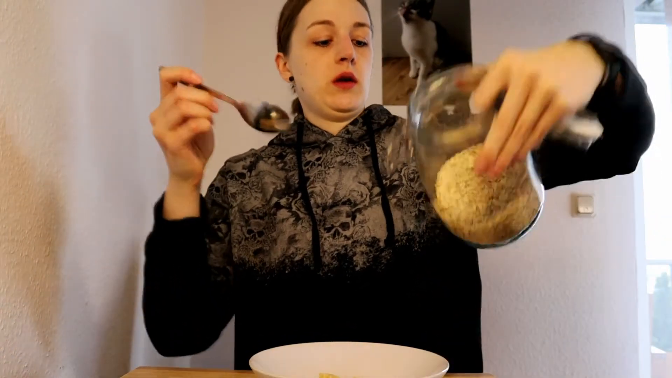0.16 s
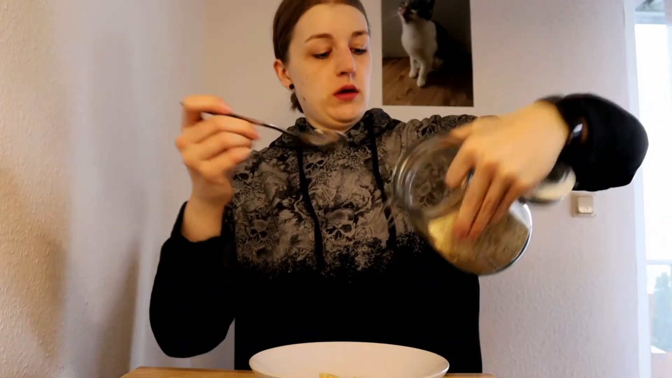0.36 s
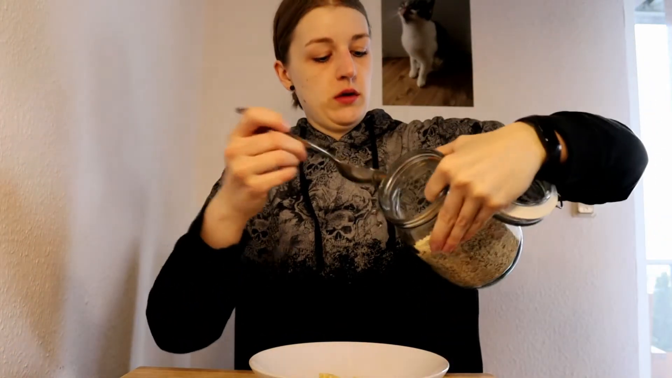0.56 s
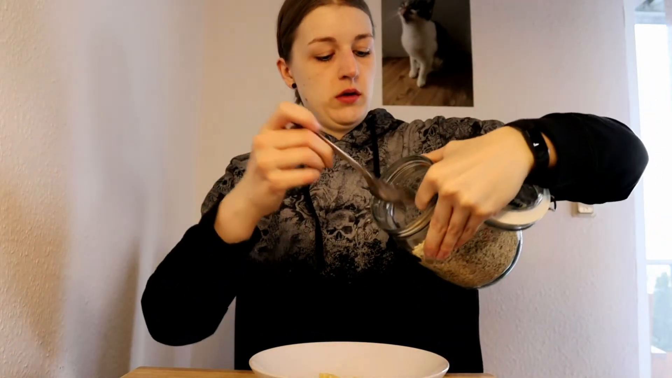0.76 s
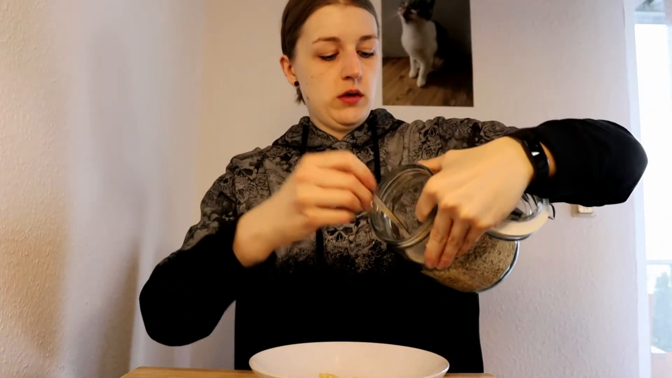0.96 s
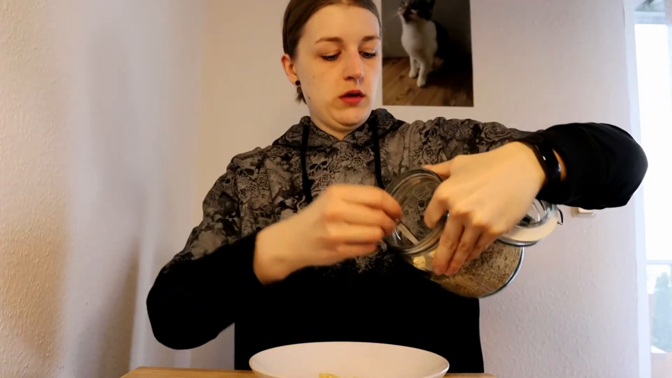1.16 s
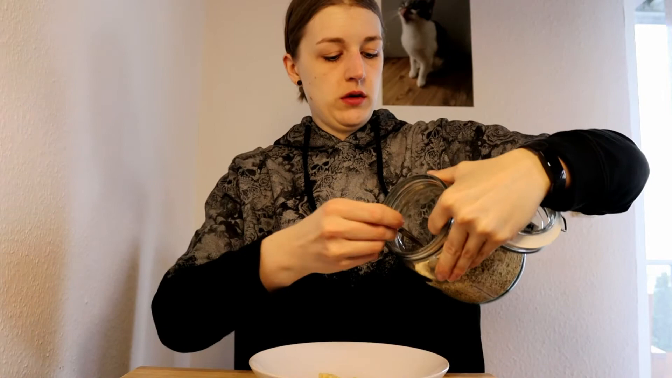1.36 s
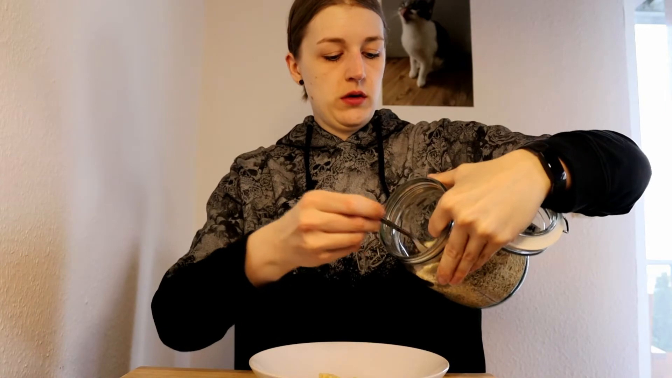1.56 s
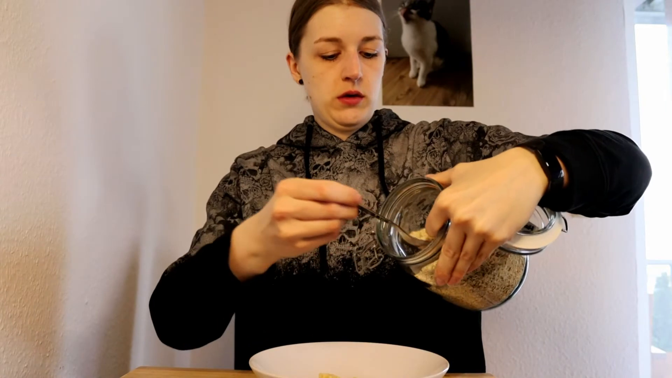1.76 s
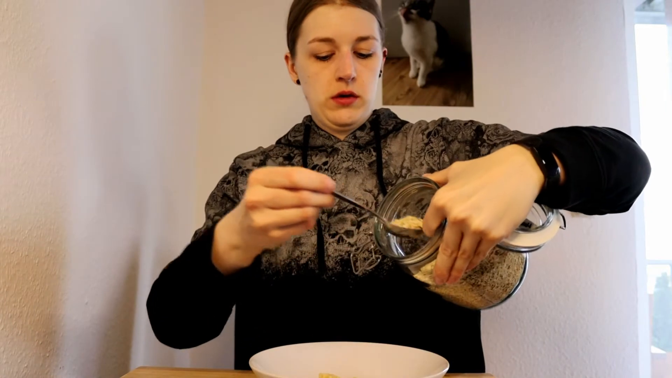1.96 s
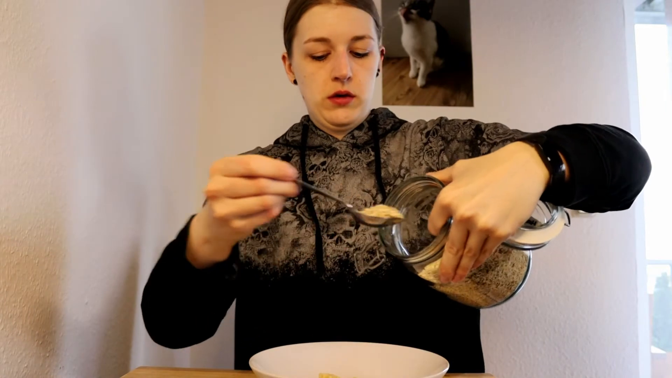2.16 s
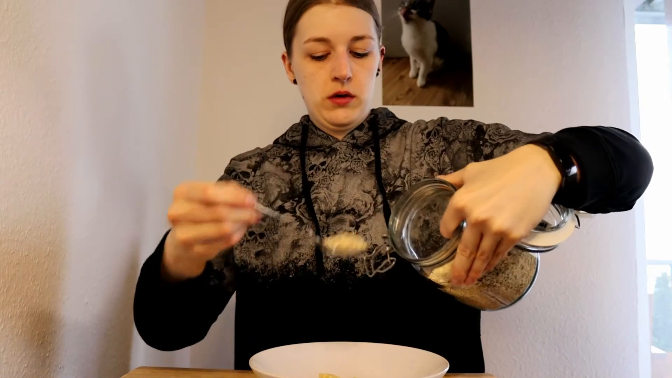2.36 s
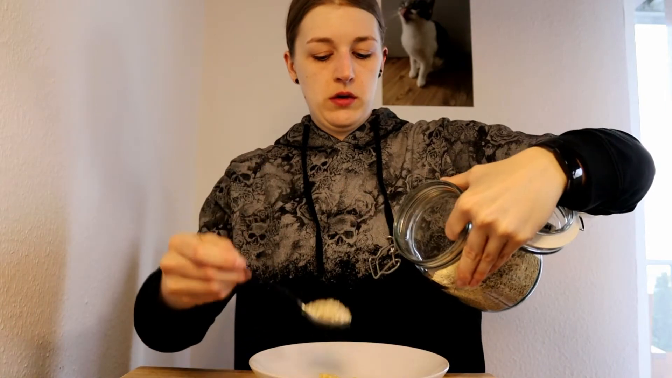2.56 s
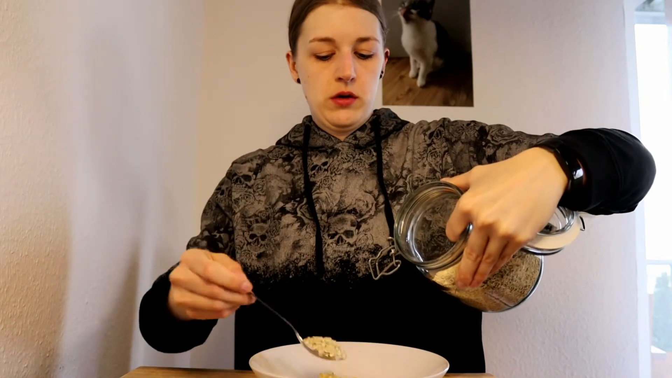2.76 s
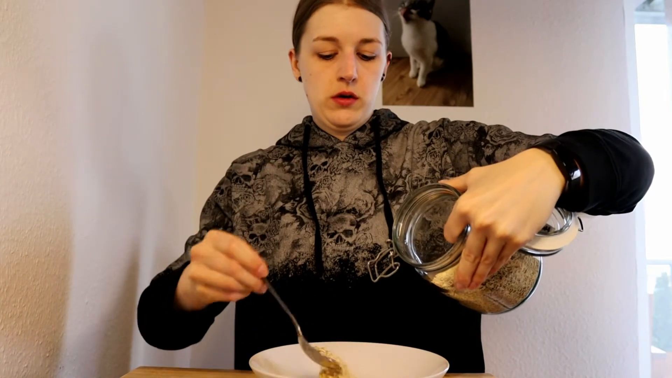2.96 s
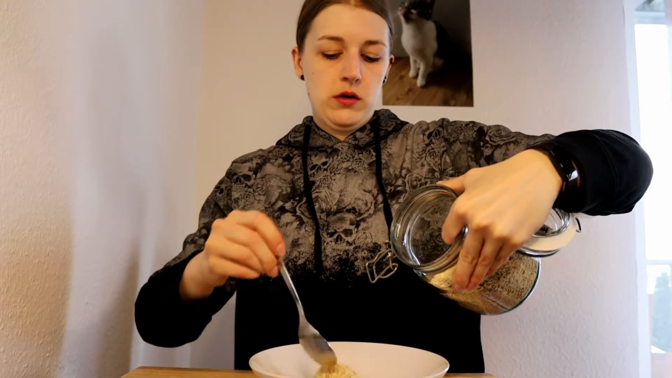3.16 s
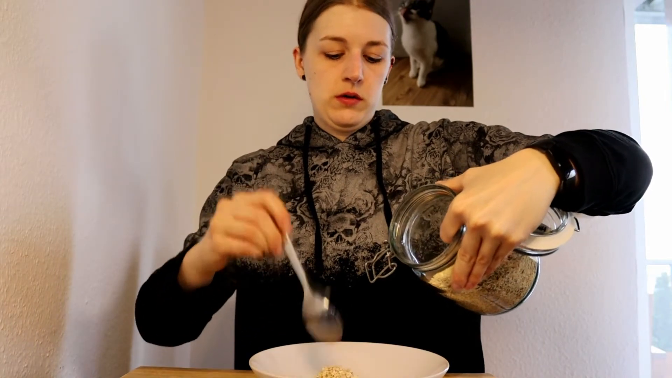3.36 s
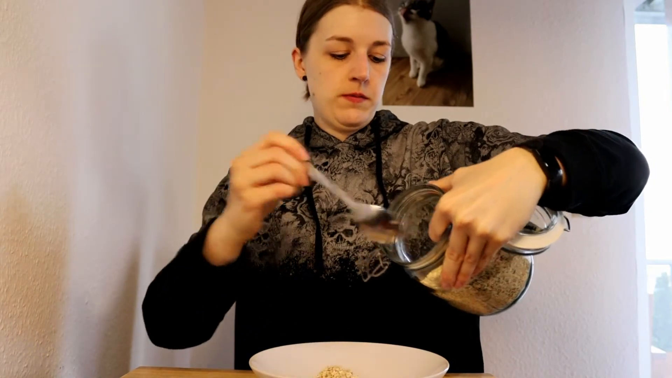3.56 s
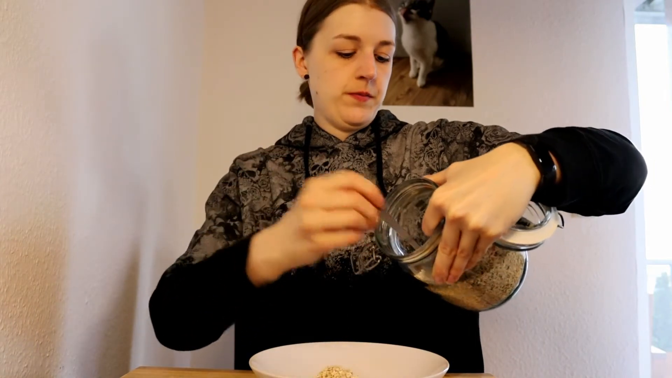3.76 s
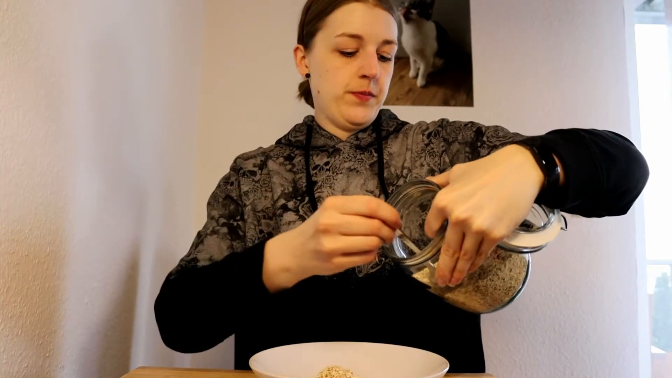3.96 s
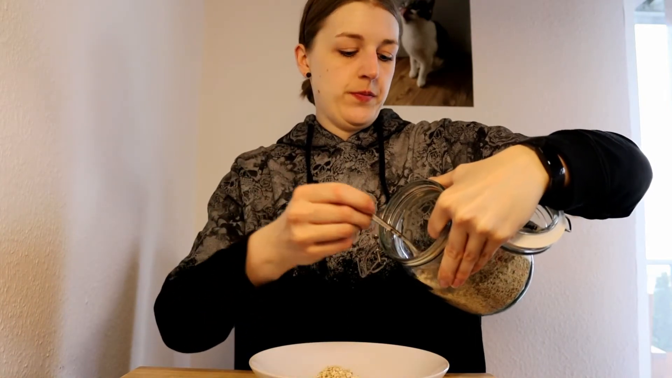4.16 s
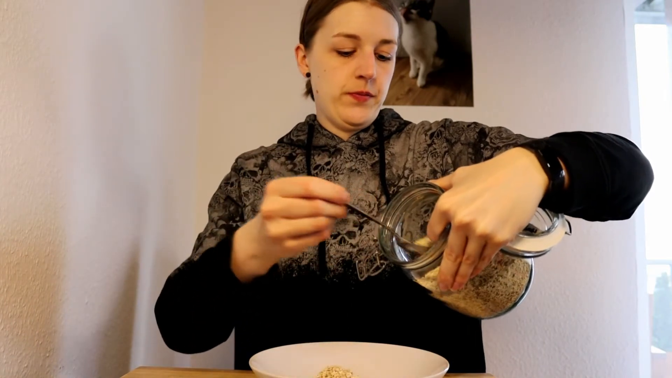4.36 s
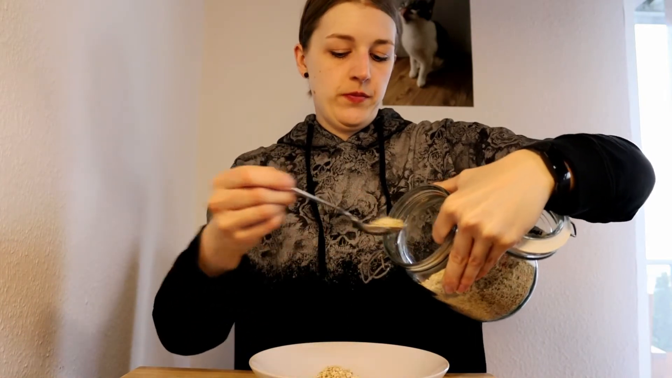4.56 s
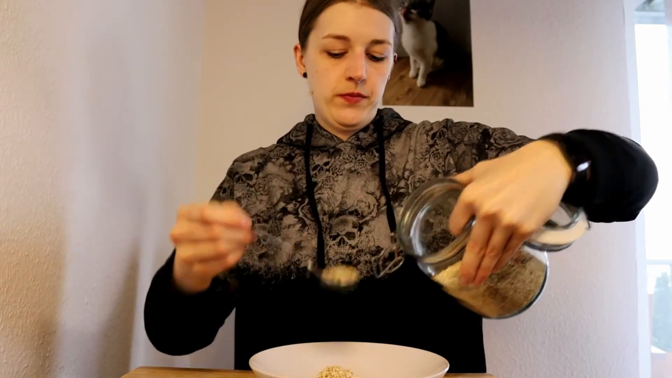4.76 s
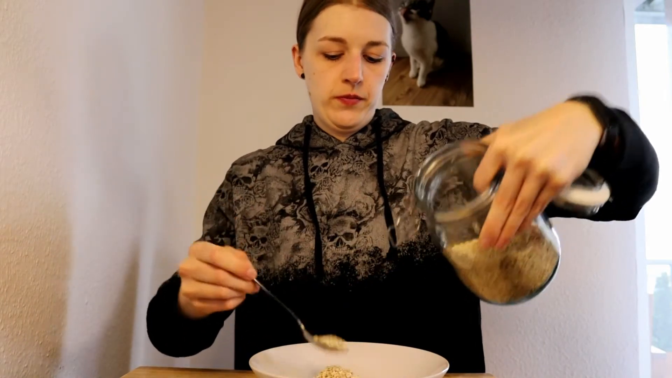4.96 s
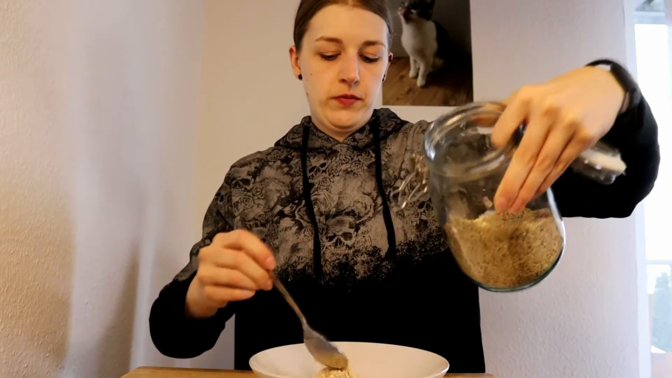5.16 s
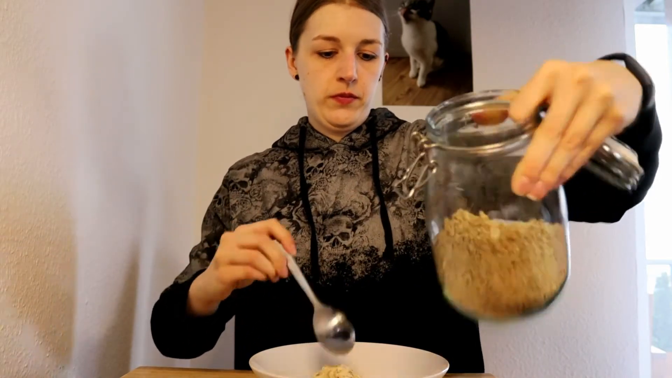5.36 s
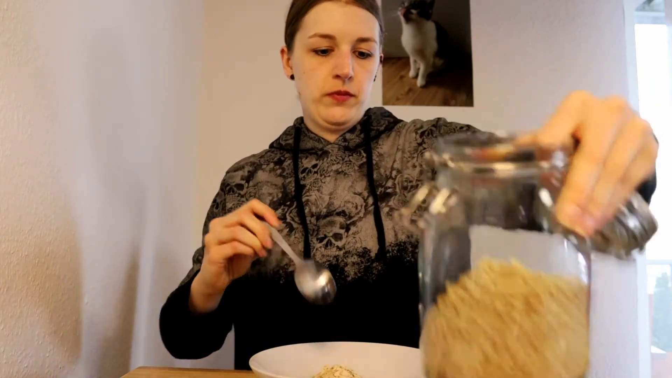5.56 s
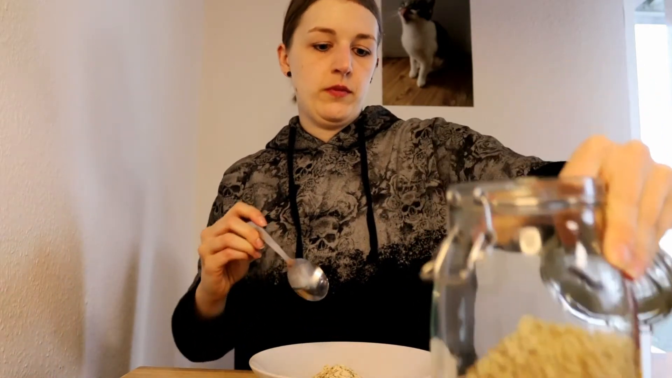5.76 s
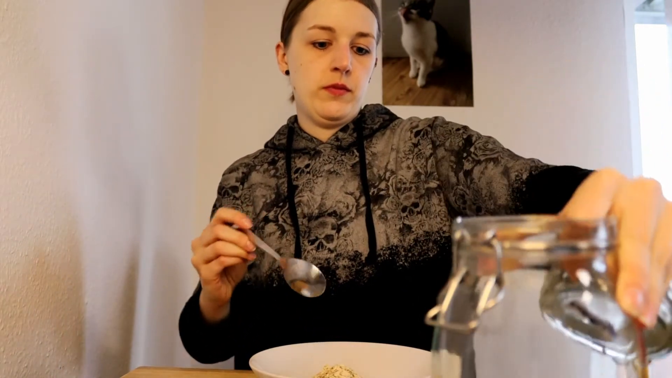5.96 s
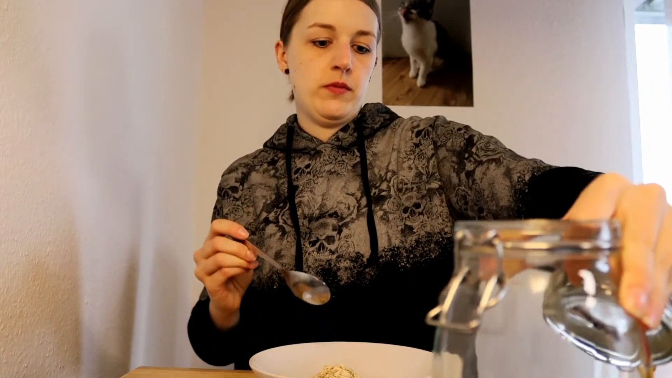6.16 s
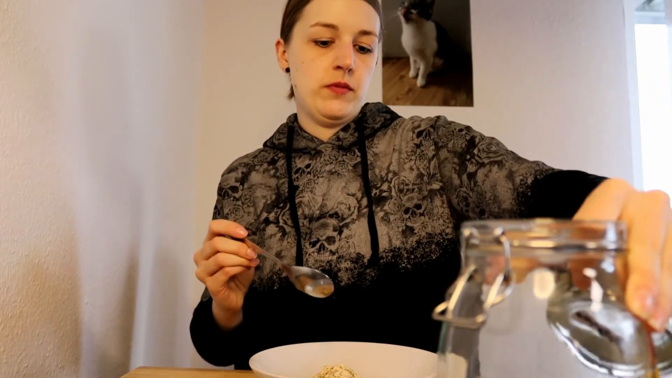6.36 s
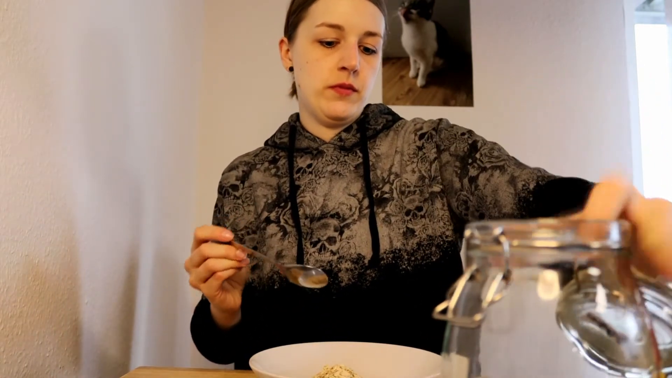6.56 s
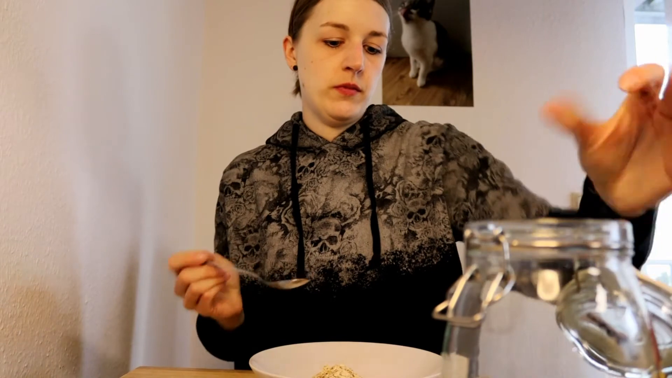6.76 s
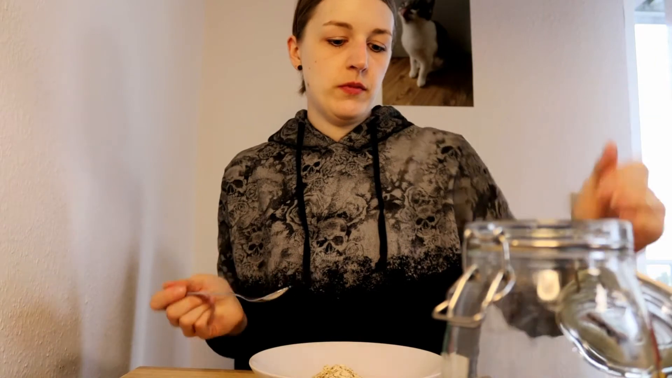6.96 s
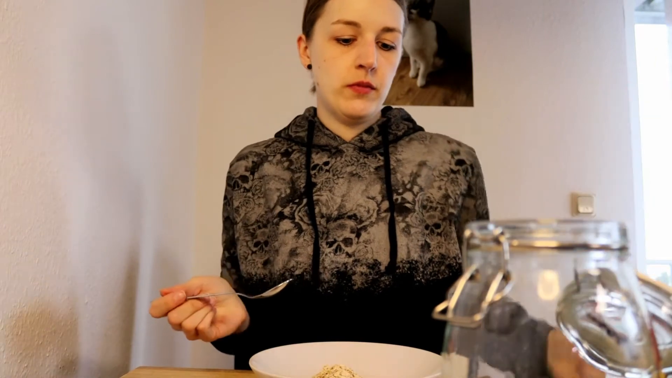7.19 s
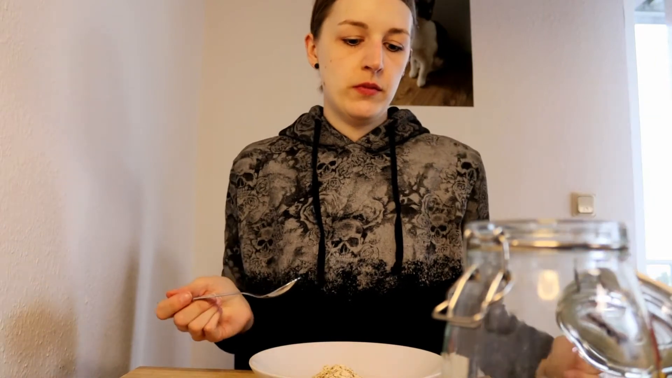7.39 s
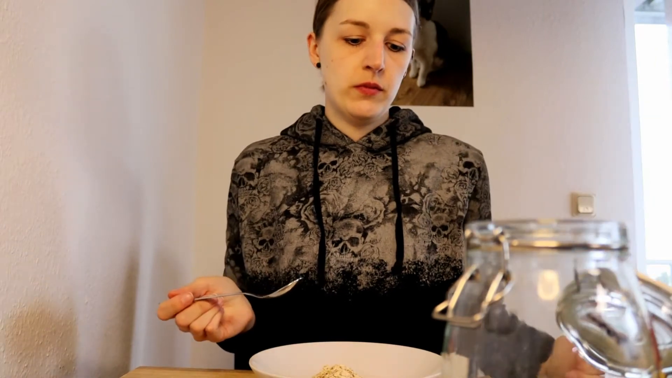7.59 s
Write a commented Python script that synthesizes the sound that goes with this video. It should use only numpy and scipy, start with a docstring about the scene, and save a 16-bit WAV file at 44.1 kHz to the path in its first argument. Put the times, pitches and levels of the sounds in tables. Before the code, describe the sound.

Oats are spooned from a clip-top glass jar into a china bowl, lid knocking, bright clinks, then the jar thuds loudly onto a wooden table.

```python
"""Spooning oats from a jar

Oats are spooned from a clip-top glass jar into a china bowl in a small kitchen, while two cars pass outside.
Lid, wire clasp, rim, taps and table are struck bodies: decaying modes plus filtered contact noise.
Flakes are dense random ticks coloured by glass or china, and the cars are shaped noise falling off as
1 / distance. The jar is set down close to the microphone, whose limiter ducks the loudest knocks."""
import sys
import numpy as np
from scipy import signal
from scipy.fft import rfft, irfft, next_fast_len
from scipy.io import wavfile
from scipy.ndimage import uniform_filter1d, minimum_filter1d

SR = 44100
rng = np.random.default_rng(int(sys.argv[2]) if len(sys.argv) > 2 else 0)


def digitize_waveform(pressure):
    """Quantize a signal to 16-bit integers and store it at the path in sys.argv[1].

    Rows of a 2-D input are taken as channels; values are limited to [-1, 1].
    """
    field = np.atleast_2d(pressure).T
    bounded = np.clip(field, -1, 1)
    quanta = np.round(bounded * 32767).astype(np.int16)
    wavfile.write(sys.argv[1], SR, quanta)


N = 336483
TIME = np.arange(N) / SR  # s
RING = TIME[:SR * 3 // 4]  # time axis of one blow and of the room's tail, s


def undb(db):
    """Logarithmic level: decibels become an amplitude gain."""
    return 10 ** (np.asarray(db) / 20)


def unit(x):
    """Normalisation: scale to an rms value of 1."""
    return x / np.sqrt(np.mean(x ** 2))


def at(points, hz):
    """Spectral interpolation: read (f/Hz, value) points on a log-frequency axis."""
    f, value = np.transpose(points)
    return np.interp(np.log(hz + 1), np.log(f), value)


def shape(x, gain):
    """Minimum-phase filtering: folding the cepstrum makes the magnitude gain(hz) causal."""
    n = 2 * next_fast_len(x.shape[-1])
    hz = np.arange(n // 2 + 1) * SR / n
    cepstrum = irfft(np.log(gain(hz) + 1e-9))
    cepstrum[1:n // 2] *= 2
    cepstrum[n // 2 + 1:] = 0
    response = np.exp(rfft(cepstrum))
    return irfft(rfft(x, n) * response)[..., :x.shape[-1]]


def stereo(pair, points, apart_hz):
    """Interaural coherence: two unrelated signals share one colour, most alike well below apart_hz."""
    def width(hz):
        return .1 + .75 * hz ** 2 / (hz ** 2 + apart_hz ** 2)

    mid = shape(pair[0], lambda hz: undb(at(points, hz)))
    side = shape(pair[1], lambda hz: undb(at(points, hz)) * width(hz))
    return unit(np.array([mid + side, mid - side]))


def resonate(x, modes, lift_db, width_hz):
    """Resonance: noise made on a body is lifted around each mode, in bands that widen with frequency."""
    top = max(db for db, _ in modes.values())

    def gain(hz):
        total = 0
        for f, (db, _) in modes.items():
            half_width = width_hz * np.sqrt(f / 1000)
            total = total + undb(db - top) / (1 + ((hz - f) / half_width) ** 2)
        return 1 + undb(lift_db) * total
    return shape(x, gain)


def waver(rate, spread_db):
    """Random modulation: chance levels, drawn rate times a second, are smoothed into a wandering gain."""
    k = int(SR / rate)
    held = np.repeat(rng.standard_normal(N // k + 1), k)
    return undb(spread_db * uniform_filter1d(held, k)[:N])


def add(out, s, x):
    """Superposition: mix x into out from time s."""
    i = int(s * SR)
    out[:, i:i + x.shape[1]] += x[:, :N - i]


def strike(modes, crack, crack_db, crack_t60, snap_db, spread):
    """Modal impact: modes start together, so close pairs beat, under a burst of contact noise."""
    hz, db, t60 = np.transpose([(f, *mode) for f, mode in modes.items()])[:, :, None]
    # each mode reaches the two sides out of step
    skew = spread * np.minimum(hz / 2000, 1) * rng.choice([-1, 1], hz.shape)
    phase = 2 * np.pi * hz * RING + hz / 5000 * rng.standard_normal(hz.shape)
    fade = undb(db - 60 * RING / t60)
    ring = np.array([(fade * np.sin(phase + side * skew)).sum(0) for side in (-1, 1)])
    ring *= 1 - np.exp(-RING / 0.0023)
    noise = stereo(rng.standard_normal((2, len(RING))), crack, 900)
    noise = resonate(noise, modes, lift_db=8.5, width_hz=33)
    burst = noise * undb(-60 * RING / crack_t60)
    # the first milliseconds of hard contact are the brightest
    snap = np.diff(noise, prepend=0) * np.exp(-(RING / 0.0022) ** 2)
    return unit(ring) + undb(crack_db) * unit(burst) + undb(snap_db) * unit(snap)


def blows(events, modes, crack, crack_db, crack_t60, snap_db, spread):
    """Contact stiffness: softer contact dulls a blow, and its place may favour one resonance."""
    out = np.zeros((2, N))
    for s, db, soft_hz, pan_db, *place in events:
        x = strike(modes, crack, crack_db, crack_t60, snap_db, spread)
        x = shape(x, lambda hz: 1 / np.sqrt(1 + (hz / soft_hz) ** 4))
        if place:
            place_hz, lift_db = place
            x = shape(x, lambda hz: undb(lift_db / (1 + ((hz - place_hz) / 75) ** 2)))
        x /= np.sqrt(np.mean(x[:, :SR // 50] ** 2))  # the level is that of the first 20 ms
        pan = np.array([[pan_db], [-pan_db]]) / 2
        add(out, s, x * undb(db + pan))
    return out


SLIDE_RANGE_DB = 20  # change of level over one rise or one fall
CLUMPS_PER_S, CLUMP_DB = 45, 3  # flakes move in clumps


def flow(slides):
    """Granular flow: each slide swells exponentially to its peak and runs out, in uneven clumps."""
    power = 0
    for s, db, rise, fall in slides:
        from_peak = np.maximum((s - TIME) / rise, (TIME - s) / fall)
        power = power + undb(db - SLIDE_RANGE_DB * from_peak) ** 2
    return np.sqrt(power) * waver(CLUMPS_PER_S, CLUMP_DB)


def oats(slides, colour, vessel, per_s, size_db, lift_db, width_hz):
    """Shot noise: countless flakes of uneven size tick against a vessel and pick up its resonances."""
    struck = rng.random((2, N)) < per_s / SR
    size = undb(size_db * np.minimum(rng.exponential(size=(2, N)), 4))
    ticks = struck * rng.standard_normal((2, N)) * size
    coloured = stereo(ticks, colour, 1500)
    return unit(resonate(coloured, vessel, lift_db, width_hz)) * flow(slides)


# cars outside: nearest at t/s, speed/(m/s), road roar level/dB, tyre hum level/dB, engine level/dB
CARS = [(2.45, 13.7, -48.5, -58.5, -81), (3.92, 9.2, -58.5, -57.5, -64)]
# colours of road roar, tyre hum and engine: f/Hz, level/dB
ROAR = [(35, -24), (55, 0), (85, -24.5), (130, -7), (190, 2), (330, 0.5), (550, -6.5), (850, -3.5),
        (1300, -7.5), (2000, -21), (3500, -36), (8000, -45.5)]
TYRES = [(300, -17), (700, -23), (1030, 2.5), (1300, -13), (1800, -14), (4000, -42)]
ENGINE = [(25, -26.5), (44, -8), (54, 1.5), (66, -9), (100, -4.5), (160, -34.5)]
STREET_M = 10.3  # nearest distance of the cars
ROAR_REAR_DB, ENGINE_FRONT_DB = 0.56, 2.5  # the roar is louder behind a car, the engine ahead of it


def traffic():
    """Spherical spreading: cars pass at steady speed, their amplitude falling off as 1 / distance."""
    power = 0
    for s, speed, roar_db, tyre_db, engine_db in CARS:
        along = speed * (TIME - s)
        distance = np.hypot(along, STREET_M)
        away = along / distance  # negative approaching, positive receding
        roar_level = roar_db + ROAR_REAR_DB * away
        engine_level = engine_db - ENGINE_FRONT_DB * away
        levels = [roar_level, np.full(N, tyre_db), engine_level]
        power = power + (undb(levels) * STREET_M / distance) ** 2
    roar, tyres, engine = (stereo(rng.standard_normal((2, N)), colour, 620) * gain
                           for colour, gain in zip((ROAR, TYRES, ENGINE), np.sqrt(power)))
    return roar * waver(4.5, 0.31) + tyres * waver(9.7, 0.4) + engine


# colour of the still air in the room: f/Hz, level/dB
STILL_AIR = [(15, -58.5), (25, -27.5), (76, -11.5), (130, -5), (195, -10.5), (277, -14.5), (301, -25),
             (451, -12), (531, -18.5), (575, -22), (962, -28.5), (1790, -26), (2990, -26), (13600, -34),
             (16000, -31.5)]


def still_air(level_db):
    """Stationary noise: a steady, coloured hush."""
    return undb(level_db) * stereo(rng.standard_normal((2, N)), STILL_AIR, 1200)


# flakes sliding as the jar tilts or the spoon digs: peak t/s, level/dB, rise t/s, fall t/s
JAR_SLIDES = [(.15, -60, 0.26, .7), (.46, -40, 0.097, 0.095), (1.16, -55, 0.23, 0.36),
              (1.64, -58.5, 0.73, 0.35), (3.87, -50.5, 0.16, 0.16), (4.28, -58, 0.32, 0.2),
              (4.54, -63, 0.22, 0.16), (5.42, -51, 0.2, .24), (5.78, -48.5, 0.35, 0.069)]
# colour of flakes sliding on glass: f/Hz, level/dB
SLIDING = [(800, -19), (2700, -6), (3800, -1.5), (6000, -5), (7200, -6), (10000, -4), (14000, 1.5),
           (16000, -1.5)]
# resonances of the air inside the jar: f/Hz: (level/dB, t60/s, which sliding does not use)
JAR_AIR = {3794: (-1, .05), 4641: (-1, .05), 4961: (-2.2, .05), 6200: (-1, .05), 7950: (-4, .05),
           8300: (0, .05)}


def sliding_in_jar():
    """Cavity resonance: sliding flakes are heard through the air inside the jar."""
    return oats(JAR_SLIDES, SLIDING, JAR_AIR, per_s=5000, size_db=2.6, lift_db=7, width_hz=40)


# wire ticking in its hinge: t/s, level/dB, left minus right level/dB
WIRE_TICKS = [(0.125, -50, -5), (0.183, -40.5, -2), (0.1995, -37, -6), (5.4568, -42, -5),
              (5.5424, -45, -10), (5.5975, -33.5, -6.5), (5.7695, -38.5, -2.5)]
# clasp striking the glass, which rings both: t/s, glass level/dB, wire level/dB, wire cut-off f/Hz,
# left minus right level/dB, resonance at that place f/Hz, its lift level/dB
CLASP_KNOCKS = [(5.3993, -40, -35, 8650, -5.5, 1900, 6.5), (5.5492, -19.5, -33.5, 5500, -2, 2200, 4),
                (5.6080, -21.5, -31.5, 11030, 0.5, 1550, 1.5), (5.6503, -28.5, -49, 9010, -0.5, 1760, 2),
                (5.6730, -32, -24, 13000, -3, 1250, 6), (5.7010, -30.5, -36, 10900, -0.5, 1720, 1.5)]
# modes of the wire: f/Hz: (level/dB, t60/s)
WIRE = {3770: (-6, .05), 4950: (-2, 0.043), 5180: (0, .06), 5420: (-2, 0.045), 7940: (0.5, 0.072),
        9550: (-3.5, .06), 9850: (-2, 0.078), 10550: (-1, 0.054), 12700: (-8, 0.078), 14100: (3, .07)}
# colour of its contact noise: f/Hz, level/dB
WIRE_CRACK = [(500, -16.5), (1800, -2), (3000, -21), (3800, 0.5), (4300, -16.5), (5200, -1), (6900, -17),
              (8000, -15.5), (10300, -4), (11600, -4), (14000, -2.5), (16000, -14.5)]
WIRE_CUT_HZ, WIRE_BOUNCE_S, WIRE_BOUNCE_DB = 13500, 0.0047, 0  # every tick rebounds once


def wire():
    """Rebound: the wire rings with each clasp knock, and ticks twice each time it moves in its hinge."""
    ticks = [(s, db, cut_hz, pan) for s, _, db, cut_hz, pan, *_ in CLASP_KNOCKS]
    for s, db, pan in WIRE_TICKS:
        ticks.append((s, db, WIRE_CUT_HZ, pan))
        ticks.append((s + WIRE_BOUNCE_S, db + WIRE_BOUNCE_DB, WIRE_CUT_HZ, pan))
    return blows(ticks, WIRE, WIRE_CRACK, crack_db=7.0, crack_t60=0.045, snap_db=-13, spread=0.63)


# glass lid knocking on its hinge: t/s, level/dB, left minus right level/dB, lift of its longest ring level/dB
LID_KNOCKS = [(0.1424, -20, -2.5, -2.5), (0.7180, -34.5, -2, -1.5), (1.499, -47.5, 2, 9),
              (2.763, -50, 3, 5), (3.02, -54, 2, 3), (3.4610, -51.5, -1, 5)]
# modes of the lid: f/Hz: (level/dB, t60/s)
LID = {1136: (1.7, 0.037), 1165: (-8.5, 0.099), 1560: (-3, 0.062), 1739: (2, 0.044), 1800: (-1.1, 0.098),
       1850: (-7.5, .16), 1965: (1.94, 0.056), 2288: (-7, 0.047), 2934: (-7, 0.019), 3450: (-16, 0.032),
       3763: (-0.506, 0.041), 4861: (-13, .04), 5432: (-14.5, .04)}
# colour of its contact noise: f/Hz, level/dB
LID_CRACK = [(150, -33.5), (400, -14), (650, -6), (900, -21), (1200, -2), (1900, -4), (2600, -8),
             (4200, -8), (5200, -1), (7000, -19), (9000, -10), (15000, -12)]
LID_CUT_HZ, LID_DB_PER_OCTAVE = 4200, 49.5  # cut-off at 0 dB, and the rise in level that doubles it
LID_RING_HZ = 1850  # its longest ring


def lid():
    """Nonlinear contact: a harder knock of the lid is brighter."""
    knocks = []
    for s, db, pan, lift in LID_KNOCKS:
        cut_hz = LID_CUT_HZ * 2 ** (db / LID_DB_PER_OCTAVE)
        knocks.append((s, db, cut_hz, pan, LID_RING_HZ, lift))
    return blows(knocks, LID, LID_CRACK, crack_db=0.5, crack_t60=0.03, snap_db=-13.0, spread=0.57)


# spoon on the jar: t/s, level/dB, rim resonance f/Hz, its lift level/dB
CLINKS = [(0.9224, -15.5, 1637, -1), (3.7490, -23, 1670, 3.5)]
# returns of every clink: delay t/s, level re the clink/dB, cut-off f/Hz, left minus right level/dB,
# rim resonance f/Hz, its lift level/dB
CLINK_RETURNS = [(.0096, -8.5, 4600, 4, 1650, 4), (0.0416, -13.5, 1900, 1.5, 1710, 8.5)]
# modes of the jar: f/Hz: (level/dB, t60/s)
JAR = {1141: (-22, .2), 1529: (-3, .18), 1591: (-6, .12), 1626: (3, .23), 1648: (-1, .19), 1690: (-3, .14),
       1783: (-5, .14), 1986: (-13, .12), 2290: (-12, .06), 2620: (-11, .06), 3074: (-8, .08),
       3548: (-15, .1), 3765: (-11, .28), 3892: (-11, .1), 4506: (-15, .09), 4936: (-12, .16),
       5150: (-9, .07), 5696: (-18, .08), 7950: (-7, .06), 8441: (-3, .09), 8540: (-12, .28),
       9060: (-9, .08), 9841: (-6, .08), 10595: (2, .09), 12620: (-5, .07), 12830: (-11, .24),
       14420: (-5, .08), 15200: (-8, .07)}
# colour of its contact noise: f/Hz, level/dB
JAR_CRACK = [(200, -18.5), (450, -16.5), (700, -2.5), (1100, -11), (1700, -0.5), (2400, -2), (3600, -6),
             (5200, 2), (6600, -17), (8300, -3.5), (10500, -4), (11600, -11.5), (13000, 1), (15500, -9)]
CLINK_CUT_HZ, CLINK_PAN_DB = 14000, -2


def spoon_on_rim():
    """Specular reflection: each clink rings the jar and returns twice from the walls, duller."""
    hits = []
    for s, db, *rim in CLINKS:
        hits.append((s, db, CLINK_CUT_HZ, CLINK_PAN_DB, *rim))
        for delay, loss_db, *tone in CLINK_RETURNS:
            hits.append((s + delay, db + loss_db, *tone))
    return blows(hits, JAR, JAR_CRACK, crack_db=5.5, crack_t60=0.047, snap_db=-5.5, spread=0.75)


# light touches of the spoon in jar or bowl: t/s, level/dB
TAPS = [(1.879, -57), (1.914, -60), (2.6512, -53.5), (2.7480, -46), (2.901, -57), (2.923, -54.5),
        (3.5337, -58.5), (4.43, -54.5), (4.56, -60), (4.9612, -55), (5.304, -52.5)]
# china-like modes: f/Hz: (level/dB, t60/s)
CHINA = {1880: (-14, .15), 2450: (-14, .06), 4000: (-1, .07), 4180: (-3, .06), 6420: (1, .07),
         6900: (-9, .06), 8100: (-8, .06), 9600: (-3, .06), 10400: (-10, .05), 13100: (-7, .05)}
# colour of flakes and of light touches: f/Hz, level/dB
FLAKES = [(800, -13.5), (2500, -3.5), (4000, -3.5), (5200, -4), (7000, -7), (10000, -4.5), (14000, -3),
          (16000, -5.5)]
TAP_CUT_HZ, TAP_PAN_DB = 16000, -2


def spoon_taps():
    """Modal excitation: light touches of the spoon in jar or bowl are all given one china-like ring."""
    taps = [(s, db, TAP_CUT_HZ, TAP_PAN_DB) for s, db in TAPS]
    return blows(taps, CHINA, FLAKES, crack_db=3, crack_t60=0.04, snap_db=1, spread=0.53)


# flakes poured or scraped in the bowl: peak t/s, level/dB, rise t/s, fall t/s
BOWL_FLOWS = [(3.10, -51, 0.27, 0.27), (3.28, -50.5, 0.32, .19), (5.33, -52.5, 0.24, .22)]


def flakes_in_bowl():
    """Resonant filtering: flakes poured or scraped in the bowl take on china-like modes."""
    return oats(BOWL_FLOWS, FLAKES, CHINA, per_s=2600, size_db=2.6, lift_db=12, width_hz=50)


# modes of the glass under the clasp: f/Hz: (level/dB, t60/s)
CLASP = {1233: (-13, 0.11), 1540: (-13.5, 0.17), 1660: (0, 0.097), 1750: (0, .06), 1850: (1.5, 0.065),
         2740: (-10, 0.055), 3763: (-2.5, 0.067), 4630: (-12.5, 0.033), 5150: (-13, 0.031)}
CLASP_CUT_HZ = 4000


def clasp_on_glass():
    """Driving-point response: the place where the clasp strikes favours one resonance of the glass."""
    glass = [(s, db, CLASP_CUT_HZ, *place) for s, db, _, _, *place in CLASP_KNOCKS]
    return blows(glass, CLASP, LID_CRACK, crack_db=-1.5, crack_t60=0.071, snap_db=-11.5, spread=1.0)


# jar base meeting the table: t/s, level/dB, contact cut-off f/Hz, left minus right level/dB,
# base resonance f/Hz, its lift level/dB
THUDS = [(6.0428, -1.5, 5500, -1, 890, 10.5), (6.1975, -12, 4860, -1.5, 1103, 11.5),
         (6.4315, -43, 1100, 0, 740, 11), (6.445, -41.5, 1300, -2, 1070, -15),
         (6.4555, -30.5, 1220, 1, 950, -28), (6.4642, -18, 3460, -2, 624, 9.5),
         (6.526, -35, 3100, -1, 705, 2), (6.592, -54, 9070, -10, 700, 0), (7.345, -50, 218, -4, 190, 19)]
# modes of the table: f/Hz: (level/dB, t60/s)
TABLE = {48: (-26.5, 0.98), 210: (-20.5, .14), 129.3: (-15, 0.45), 246: (-17, 0.34), 326.5: (-5.5, 0.27),
         660: (-7.5, 0.091), 729: (-8, 0.18), 900: (-12, 0.083), 928: (-2.7, 0.17), 1010: (-4, 0.094),
         1093: (-5.5, 0.27), 1254: (-5.5, 0.13), 1334: (-12.5, 0.079), 1523: (-6, 0.26), 1687: (-13, 0.25),
         1857: (-17.5, .1), 2172: (-1.5, 0.047), 2360: (-15.5, 0.11), 2536: (-11, 0.063), 2838: (-8, 0.067),
         3143: (-8.5, 0.13), 4094: (-6.5, 0.1)}
# colour of its contact noise: f/Hz, level/dB
TABLE_CRACK = [(30, -28.5), (70, -16), (135, -7.5), (200, -19.5), (340, 2.5), (520, -16), (720, -6),
               (1100, -6.5), (1800, -13.5), (3500, -11), (6500, -16), (15000, -11.5)]


def jar_on_table():
    """Structure-borne sound: the jar's base sets the wooden table ringing."""
    return blows(THUDS, TABLE, TABLE_CRACK, crack_db=12, crack_t60=0.062, snap_db=-4.5, spread=.8)


# early reflections from table and walls: t/s, level before early_db is added/dB
ECHOES = [(.0023, -10.5), (.0095, -2), (0.0156, -14.5), (0.0415, -26.5)]
# reverberation time of the room: f/Hz, t60/s
ROOM_T60 = [(100, 1), (400, 0.47), (1500, .42), (4000, 0.28), (9000, 0.21), (16000, 0.34)]


def kitchen(x, early_db, wet_db):
    """Reverberation: direct sound, near reflections and a diffuse, bass-thin tail decaying band by band."""
    noise = stereo(rng.standard_normal((2, len(RING))), [(100, -10), (600, 0), (20000, 0)], 400)
    hz, t, bins = signal.stft(noise, SR, nperseg=256)
    decay = undb(-60 * t / at(ROOM_T60, hz)[:, None])
    tail = signal.istft(bins * decay, SR)[1][:, :len(RING)]
    tail *= 1 - np.exp(-(RING / 0.015) ** 2)
    response = undb(wet_db) * unit(tail) / np.sqrt(len(RING))
    response[:, 0] += 1  # direct sound
    for s, db in ECHOES:
        for side in range(2):
            arrival = abs(s + .00005 * rng.standard_normal())
            response[side, int(arrival * SR)] += undb(db + early_db)
    return signal.fftconvolve(x, response, axes=1)[:, :N]


def scene():
    """Superposition of fields: what the hands do is heard in the room, over street and still air."""
    behind = traffic() + still_air(level_db=-59.5)
    flakes = sliding_in_jar() + flakes_in_bowl()
    spoon = spoon_on_rim() + spoon_taps()
    near = wire() + lid() + clasp_on_glass() + jar_on_table()
    near[0] = np.roll(near[0], 2)  # the jar is held on the right, so the left port hears it later
    handled = kitchen(spoon + flakes, early_db=-6, wet_db=-11.5)
    return handled + kitchen(near, early_db=-18.0, wet_db=-13.5) + behind


def limiter(x, top_db, release_db_per_s):
    """Peak limiting: the gain drops just ahead of a loud peak and climbs back steadily in dB."""
    over = np.maximum(20 * np.log10(np.abs(x).max(0) + 1e-9) - top_db, 0)
    climb = release_db_per_s * TIME
    duck = climb - np.maximum.accumulate(over + climb)
    ahead = minimum_filter1d(duck, size=89)
    return x * undb(uniform_filter1d(ahead, size=89))


def record(dry):
    """Saturation and band-limiting: loud knocks are limited, then clipped, and the top is cut."""
    held = np.clip(limiter(dry, top_db=1.75, release_db_per_s=76.5), -1, 1)
    low_pass = signal.ellip(8, .2, 70, 15550, fs=SR, output="sos")  # edge in Hz
    return signal.sosfilt(low_pass, held)


dry = scene()
out = record(dry)
digitize_waveform(out)
```